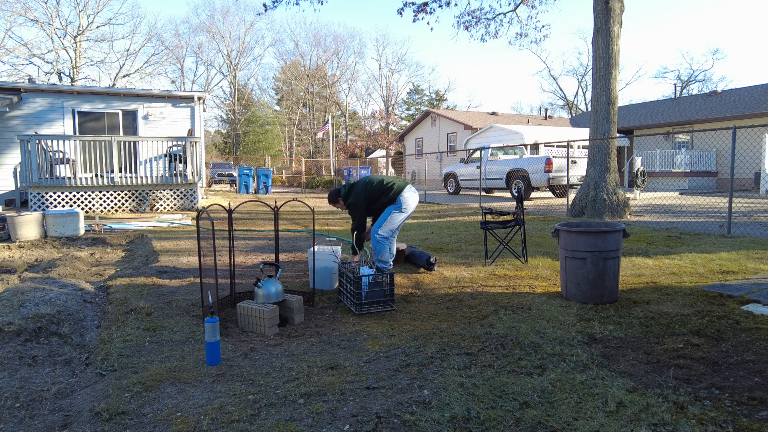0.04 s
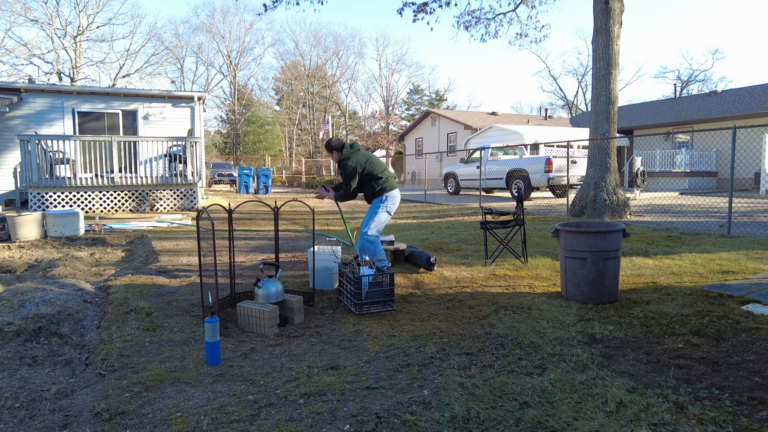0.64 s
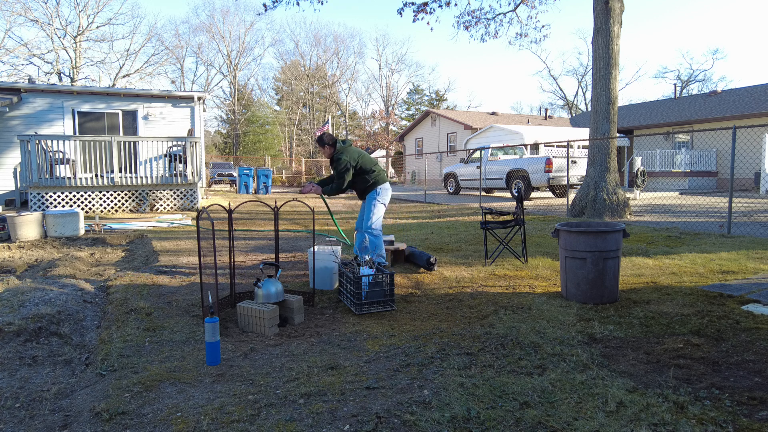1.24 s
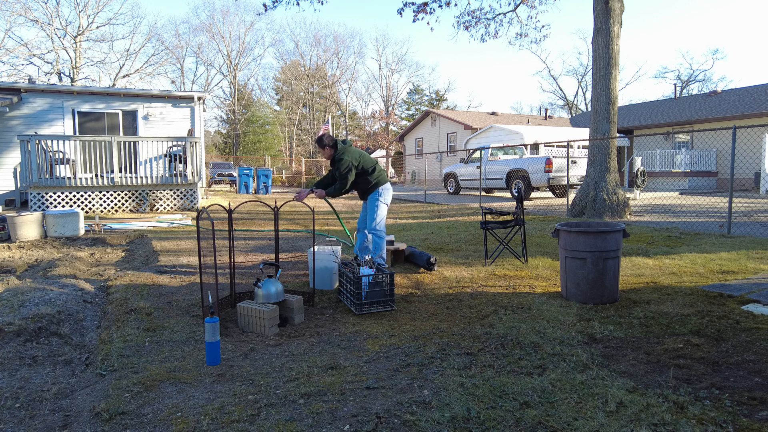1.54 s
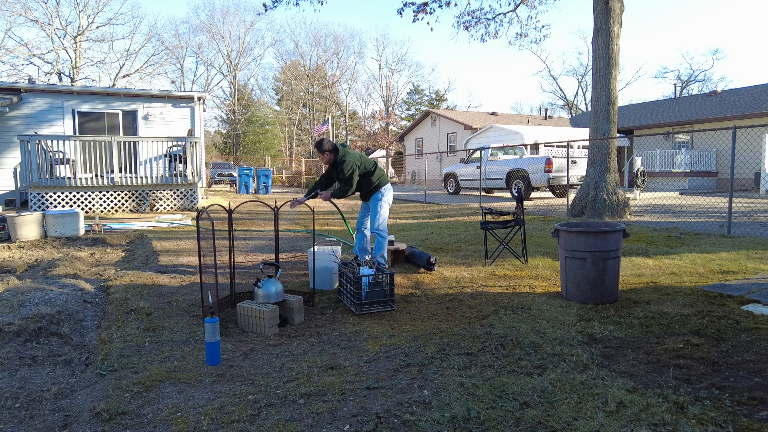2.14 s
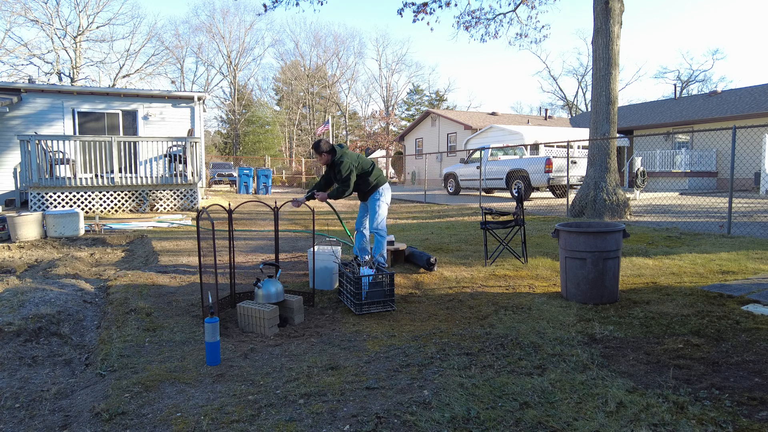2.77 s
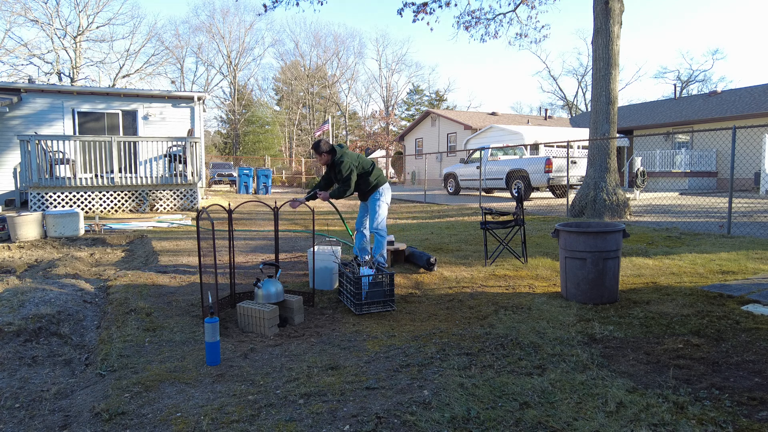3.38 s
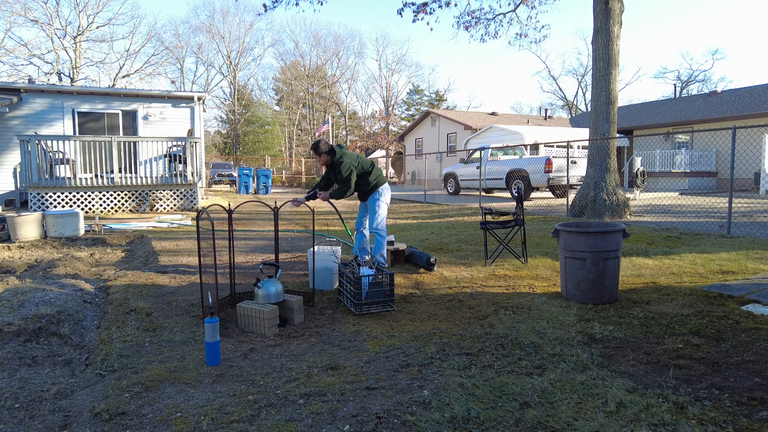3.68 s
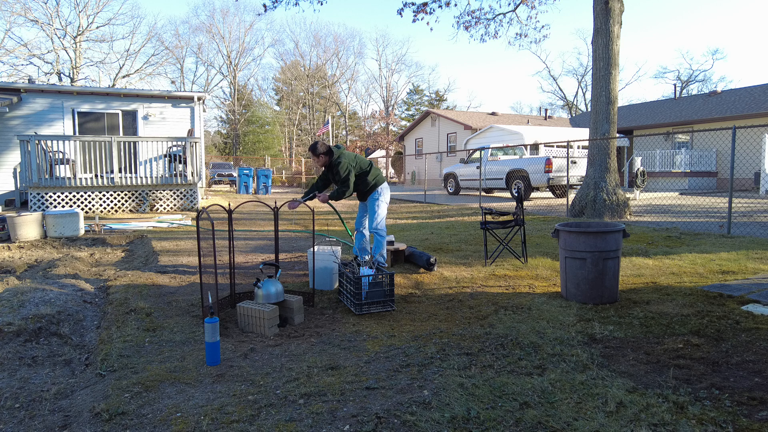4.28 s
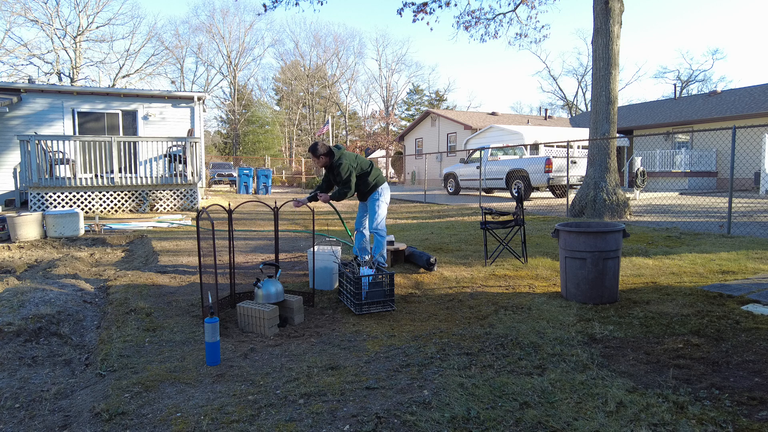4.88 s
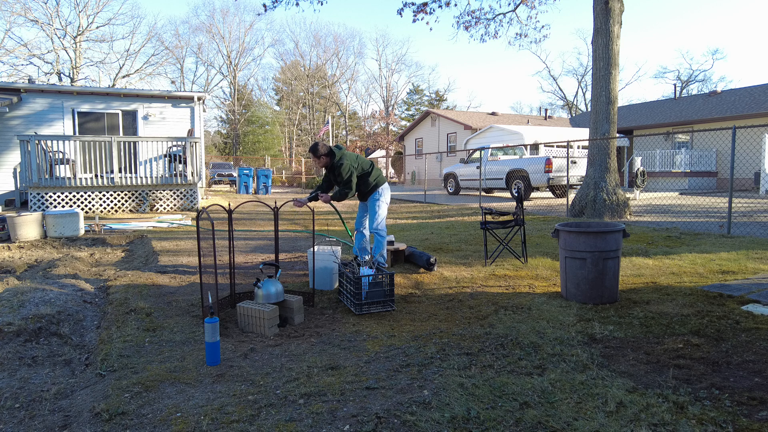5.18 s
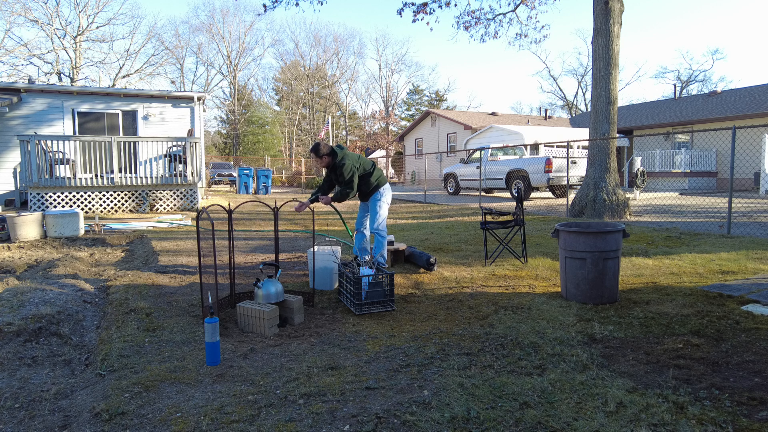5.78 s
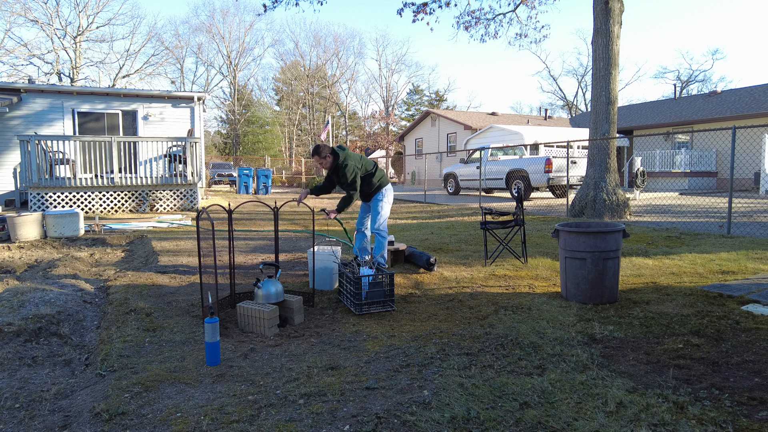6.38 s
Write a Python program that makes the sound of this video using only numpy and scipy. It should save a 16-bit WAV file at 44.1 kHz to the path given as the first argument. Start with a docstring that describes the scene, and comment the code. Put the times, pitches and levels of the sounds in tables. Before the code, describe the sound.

The scene is a quiet open yard. Throughout, two distant motors blend into a low hum that throbs five or six times a second, over a faint thin whine and a soft neighbourhood rumble. At about 1.5 seconds a garden hose opens into a bucket a few metres away, with a bright hiss and splatter. Air in the hose makes the jet sputter, briefly stalling and surging, while the water gurgles in short, hollow gulps. Big drops and the nozzle add sharp little ticks, and the handled hose knocks lightly near 1.8, 5 and 6.1 seconds. The flow weakens from around 4.7 seconds and dies away by 5.5 seconds. One last short spurt comes just before 6 seconds, followed by a few faint ticks. The hum and rumble continue until the end, at about 6.6 seconds.

```python
"""In an open yard two far motors, almost in step, beat in a throbbing hum over a thin whine and the
rumble of the neighbourhood. At 1.5 s a garden hose opens into a bucket a few metres away: drop impacts
hiss and splatter, air in the hose makes the jet sputter, and an air pocket dug by the jet gurgles.
Big drops and the nozzle tick, and the handled hose knocks. The flow dies away by 5.5 s and gives one
last spurt just before 6 s, while the hum goes on."""
import sys
import numpy as np
from scipy import signal
from scipy.fft import rfft, irfft
from scipy.io import wavfile
from scipy.ndimage import uniform_filter1d

SR = 44100
rng = np.random.default_rng(int(sys.argv[2]) if len(sys.argv) > 2 else 0)


def generate_wav(sig):
    """Save sig (samples, or channels by samples) to the path in sys.argv[1] as 16-bit PCM at SR."""
    pcm = np.round(np.clip(np.atleast_2d(sig).T, -1, 1) * 32767).astype(np.int16)
    wavfile.write(sys.argv[1], SR, pcm)


N = 291942
T, HZ = np.arange(N) / SR, np.fft.rfftfreq(N, 1 / SR)

# Spectra of the water sounds. Each row: frequency in Hz, relative spectral density in dB.
SPRAY_SPECTRUM = [(2500, -39), (4500, -21.5), (6500, -10), (8000, 0), (11500, -0.5), (13000, 1),
                  (15800, 3.5)]
SPLATTER_SPECTRUM = [(600, -10), (1200, -7), (2500, -9.5), (3700, -3.5), (5000, 1), (6300, 2.5), (8500, -5),
                     (12000, -23), (16000, -26)]
GURGLE_SPECTRUM = [(400, -18), (900, -5.5), (1400, -4), (1780, 0.5), (2200, 2), (3200, 0), (4200, 1),
                   (6500, -32), (12000, -49)]
# Resonances of the bucket. Each row: centre in Hz, width in Hz, lift in dB.
BUCKET_MODES = [(1963, 91, 4), (2580, 80, 1.5), (3306, 300, 5.5), (4580, 480, 4), (6140, 910, 2.1),
                (7390, 290, 4), (9420, 420, 5.5), (12600, 630, 5)]
# The nozzle opens, runs, shuts and spurts once more. Each row: time in seconds, level in dB.
FLOW_LEVEL = [(1.5, -96), (1.59, -57.5), (2.7, -58.5), (3.0, -57.5), (3.9, -55.5), (4.66, -58.5),
              (4.95, -62), (5.34, -63.5), (5.41, -71), (5.49, -102), (5.63, -95), (5.73, -72.5),
              (5.82, -73.5), (5.9, -61.5), (6.0, -62), (6.05, -76), (6.15, -86)]
# Air in the hose breaks the stream. Each row: start in seconds, length in seconds, gain in dB.
STALLS = [(1.78, 0.12, -3.5), (1.917, 0.084, -14), (2.507, 0.072, -8), (2.789, 0.095, -11.5),
          (3.215, .09, -3), (3.48, .12, -3), (3.755, 0.076, -7.5), (3.95, 0.073, -7), (5.01, 0.052, -10)]
# Surges slap the water. Each row: start and length in seconds, splatter and spray levels in dB.
SURGES = [(1.723, 0.13, -65.5, -70), (1.839, 0.086, -60, -59), (2.047, 0.075, -65, -60),
          (2.325, 0.19, -69.5, -61), (2.587, .11, -68.5, -56), (2.753, 0.065, -60.5, -77),
          (3.1, 0.13, -63.5, -57.5), (3.306, 0.17, -57, -57), (3.586, 0.17, -61.5, -63),
          (3.808, 0.11, -62.5, -54.5), (4.039, 0.12, -62, -70), (4.183, 0.16, -67.5, -54),
          (4.39, 0.091, -65, -65), (4.501, 0.21, -62.5, -59.5), (4.729, 0.14, -64, -60.5),
          (5.06, 0.045, -66, -60), (5.102, 0.064, -62.5, -53.5)]
# The air pocket gulps. Each row: start and length in seconds, level in dB, mid-gulp note in Hz.
GULPS = [(1.73, 0.065, -66, 3160), (1.82, 0.048, -61, 2900), (1.853, 0.068, -60.5, 2200),
         (2.76, .045, -66, 3000), (2.878, 0.17, -67.5, 2060), (3.054, 0.067, -64, 2320),
         (3.152, 0.12, -69.5, 2150), (3.308, 0.076, -58.5, 2400), (3.37, .1, -70, 2900),
         (3.528, 0.12, -66, 2120), (3.628, 0.096, -66.5, 3130), (3.821, 0.088, -62.5, 2000),
         (3.952, 0.064, -69, 2000), (4.07, .09, -75, 2400), (4.388, 0.16, -66.5, 1990),
         (4.713, 0.12, -62.5, 2800), (4.85, 0.088, -64.5, 2700), (5.131, 0.047, -63.5, 2040),
         (5.727, 0.046, -72, 3020), (5.866, 0.047, -67.5, 2450), (6.108, 0.038, -72, 2700)]
# Ticks of big drops and the nozzle. Each row: start in seconds, peak before echoes in dB, pitch in Hz.
TICKS = [(0.5584, -49, 9700), (1.5245, -51.5, 5430), (1.564, -47, 10800), (1.617, -50, 10700),
         (1.741, -40.5, 9300), (1.87, -38.5, 5570), (2.1796, -36.5, 9000), (2.788, -43, 6130),
         (3.727, -43, 13000), (4.29, -38, 9350), (4.408, -39, 9200), (4.7952, -39.5, 9000),
         (5.0497, -40, 9600), (5.0652, -39, 6000), (5.583, -56.5, 6800), (5.7436, -52, 4340),
         (5.9403, -46, 9300), (6.043, -46, 9400), (6.113, -56.5, 5000), (6.1813, -58.5, 10000),
         (6.2169, -63, 10000)]
# Knocks of the hose. Each row: start in seconds, level in dB, frequency in Hz, 60 dB decay in seconds.
KNOCKS = [(1.792, -42.5, 810, 0.0094), (1.805, -53, 700, 0.0072), (1.857, -51, 1140, .014),
          (5.065, -52.5, 1090, 0.014), (5.152, -56, 1980, 0.016), (6.1107, -54.5, 2550, 0.018),
          (6.1103, -58, 3200, 0.02), (6.1106, -58, 1220, 0.01)]
# Motor speeds. Each row: time in seconds, slow motor's rate in Hz, fast motor's lead in Hz.
MOTOR_SPEEDS = [(0, 81, 5.3), (1.4, 80.8, 5.2), (2.1, 81, 4.7), (2.8, 80.7, 5.3), (3.5, 80.7, 6.0),
                (4.4, 80.45, 6.25), (5.4, 80.35, 5.65), (6.62, 80.3, 6.0)]
# Motor tones. Each row: time in seconds, then relative levels in dB of the slow fundamental,
# the fast fundamental and the slow motor's second harmonic.
MOTOR_LEVELS = [(0.0, -51, -65, -73.5), (0.5, -51.5, -57.5, -65.5), (0.9, -54, -68, -66.5),
                (1.22, -46.5, -57, -67.5), (1.55, -64.5, -56, -71), (2.0, -68, -58, -67),
                (2.4, -52.5, -94, -65), (2.75, -63, -62, -69), (3.1, -57, -55.5, -83), (3.5, -57, -49, -70),
                (3.9, -52, -48, -66.5), (4.4, -54.5, -49, -71), (4.9, -55, -51, -80),
                (5.6, -54, -52, -69.5), (6.1, -54, -56.5, -77), (6.6, -53.5, -54, -80)]
# Third harmonics. Each row: time in seconds, relative levels in dB of the slow and the fast motor.
THIRD_HARMONICS = [(0, -84, -85), (.6, -86, -74.5), (1.2, -71, -69.5), (1.6, -90, -92), (2.4, -79, -77),
                   (3.1, -91, -75.5), (3.5, -75, -78), (3.9, -68.5, -73), (4.4, -72.5, -70),
                   (4.9, -78, -70.5), (5.6, -72, -83.5), (6.6, -93, -90)]
# The far whine and the hiss of the trees. Each row: time in seconds, relative level in dB.
WHINE_LEVEL = [(0, -79), (1.0, -76.5), (1.3, -69), (2.1, -81), (2.4, -74), (2.86, -73), (3.2, -80),
               (3.47, -73), (4.0, -88), (4.42, -66), (4.75, -84), (5.08, -66.5), (5.6, -71), (5.95, -64),
               (6.3, -68), (6.62, -72)]
LEAVES_LEVEL = [(0, -76.5), (.6, -77), (1.4, -78.5), (5.5, -81), (6.62, -85)]
# Soft low rushes. Each row: time of the crest in seconds, half width in seconds, level in dB.
RUSHES = [(.5, 0.22, -72.5), (1.21, .11, -64.5), (4.9, 1.24, -72.5), (5.83, 0.17, -68)]
# Spectra of the background noises. Each row: frequency in Hz, relative spectral density in dB.
RUMBLE_SPECTRUM = [(10, -23.5), (26, 1.5), (35, -7.5), (58, -6.5), (100, -13.5), (140, -20.5), (200, -26),
                   (400, -31.5), (750, -31.5), (1100, -37), (1550, -38), (2150, -47), (5000, -52),
                   (16000, -63)]
RUSH_SPECTRUM = [(60, -29), (150, 7.5), (280, -2), (450, 0), (700, -13), (1500, -30), (5000, -44)]
LEAVES_SPECTRUM = [(300, -15), (2000, -5), (3000, 2), (6000, -2), (10000, -7.5), (16000, -4.5)]
# Likeness of left and right. Each row: frequency in Hz, coherence from 0 to 1.
WATER_COHERENCE = [(700, 0.14), (1700, 0.98), (2800, 0.68), (3800, 0.33), (6000, 0.37), (9500, 0.39),
                   (11000, 0.48), (13000, 0.34), (16000, 0.19)]
AIR_COHERENCE = [(30, 0.98), (90, 0.99), (180, 0.78), (350, 0.57), (700, 0), (1500, 0.19), (5000, 0),
                 (16000, 0.05)]
# Resonances of the microphone's housing. Each row: centre in Hz, width in Hz, lift in dB.
HOUSING_MODES = [(1335, 99, 2.5), (2880, 410, 2), (4300, 540, 1.5), (5740, 770, 1.5), (7870, 880, 2.5),
                 (10670, 300, 2.5), (12600, 700, 0)]

SPRAY_DB, SPLATTER_DB, GURGLE_DB = -0.73, -11.5, -18.5  # relative to the flow, at full flow
FULL_FLOW_DB, COARSE_DB_PER_DB = -56, 0.61  # coarse sounds fall less as the flow weakens
ATTACK_S, RELEASE_S, SAG_DB = 0.019, 0.027, -2.5
NOTE_RISE_HZ_PER_S, POCKET_WIDTH_HZ = 3000, 540
MOTORS_OPPOSED_S, WHINE_HZ = 4.12, 629.3
RIGHT_LAG_S, BAND_LIMIT_HZ = 1.7e-5, 15830


def hose():
    """Amplitude modulation: spray, splatter and gurgle flutter together with the water pressure."""
    spray = water(SPRAY_SPECTRUM, (8000, 15800), per_s=3600, spread_db=3.5, mist=0.58, patch=(2.5, 8))
    splatter = water(SPLATTER_SPECTRUM, (3800, 7000), per_s=1600, spread_db=2, mist=0.47, patch=(2, 6))
    gurgle = water(GURGLE_SPECTRUM, (1500, 3500), per_s=980, spread_db=3, mist=0.99, patch=(2, 3))
    gurgle = 0.59 * gurgle + 0.87 * air_pocket(gurgle)
    spray_gain, splatter_gain, gurgle_gain = stream_gains()
    jet = spray * spray_gain + splatter * splatter_gain + gurgle * gurgle_gain
    flutter = gain_of(0.15 * drift(hz=89) + 0.37 * drift(hz=12))
    return jet * flutter * gain_of([[.4], [-.4]])


def water(spectrum, band_hz, per_s, spread_db, mist, patch):
    """Shot noise: drops over a mist of tiny ones, filtered by the bucket; unit mono RMS in band_hz."""
    def impacts():
        sizes = gain_of(spread_db * np.minimum(rng.exponential(1, N), 5))
        drops = evened(sizes * rng.choice([-1, 1], N) * (rng.random(N) < per_s / SR))
        patter = drops + 0.45 * reflections(drops, t60=0.04) + mist * rng.standard_normal(N)
        return rfft(wobble(patter, *patch))
    spectra = stereo_pair(impacts(), impacts(), WATER_COHERENCE)
    spectra *= gain_of(over_frequency(spectrum) + resonance_db(BUCKET_MODES))
    spectra[1] *= np.exp(-2j * np.pi * HZ * RIGHT_LAG_S)
    in_band = irfft(spectra.mean(0) * (HZ > band_hz[0]) * (HZ < band_hz[1]), N)
    return irfft(spectra, N) / in_band.std()


def wobble(x, depth_db, bins):
    """Spectral modulation: as the stream wobbles, patches of its spectrum swell and fade."""
    frames = signal.stft(x, nperseg=256)[2]
    field = rng.standard_normal(frames.shape)
    for _ in range(2):
        field = uniform_filter1d(uniform_filter1d(field, size=bins, axis=0), size=7, axis=1)
    return signal.istft(frames * gain_of(depth_db * evened(field)), nperseg=256)[1][:N]


def stream_gains():
    """Incoherent sounds add in power: surges and gulps ride on a flow broken by stalls."""
    flow = level(FLOW_LEVEL) * gain_of(sum(db * disturbance(s, length) for s, length, db in STALLS))
    coarse = gain_of(FULL_FLOW_DB) * (flow / gain_of(FULL_FLOW_DB)) ** COARSE_DB_PER_DB
    slaps, sprays = sum(gain_of([[slap_db], [spray_db]]) * disturbance(s, length)
                        for s, length, slap_db, spray_db in SURGES)
    gulps = sum(gain_of(db) * disturbance(s, length) for s, length, db, _ in GULPS)
    return (np.hypot(gain_of(SPRAY_DB) * flow, sprays),
            np.hypot(gain_of(SPLATTER_DB) * coarse, slaps),
            np.hypot(gain_of(GURGLE_DB) * coarse, gulps))


def disturbance(start, length):
    """The envelope of a stall, surge or gulp: linear attack, sagging hold, linear release."""
    age = np.clip(T - start, 0, length)
    attack, release = np.minimum(age / ATTACK_S, 1), np.minimum((length - age) / RELEASE_S, 1)
    return attack * release * gain_of(SAG_DB * age / length)


def air_pocket(x):
    """Cavity resonance: within each gulp the pocket closes, so its hollow note climbs."""
    start, length, _, mid_hz = np.transpose(GULPS)
    gulp = np.maximum(np.searchsorted(start, T) - 1, 0)
    age = np.clip(T - start[gulp], 0, length[gulp])
    note_hz = mid_hz[gulp] + NOTE_RISE_HZ_PER_S * (age - length[gulp] / 2)
    carrier = np.exp(2j * np.pi * np.cumsum(note_hz) / SR)
    pole = np.exp(-np.pi * POCKET_WIDTH_HZ / SR)
    # shift the note down to 0 Hz, smooth, and shift back
    return 2 * (carrier * signal.lfilter([1 - pole], [1, -pole], x / carrier)).real


def ticks_and_knocks():
    """Impulsive excitation: a tick is a brief snap with a quick echo, a knock is one damped mode."""
    direct, t = np.zeros(N), T[:2048]
    for start, db, hz in TICKS:
        burst = rng.standard_normal(len(t)) * np.exp(-t / .0005)
        band_hz = [hz * 0.56, min(hz * 1.41, BAND_LIMIT_HZ)]
        snap = signal.sosfilt(signal.butter(2, band_hz, "band", fs=SR, output="sos"), burst)
        snap *= gain_of(db) / abs(snap).max()
        add(direct, start, snap)
        add(direct, start + 0.001104, 0.23 * snap)
    for start, db, hz, t60 in KNOCKS:
        add(direct, start, gain_of(db - 60 * t / t60) * np.sin(2 * np.pi * hz * t))
    return direct + gain_of(-0.5) * np.array([reflections(direct, t60) for t60 in (0.16, 0.071)])


def reflections(x, t60):
    """Reverberation: dense echoes off the bucket wall and the ground decay exponentially."""
    t = T[:4096]
    response = evened(rng.standard_normal(len(t)) * gain_of(-60 * t / t60))
    return signal.oaconvolve(x, response)[:N] / np.sqrt(len(t))


def motors():
    """Beating: the fundamentals of two motors interfere five or six times a second."""
    slow_hz, lead_hz = over_time(MOTOR_SPEEDS)
    slow = 2 * np.pi * (np.cumsum(slow_hz) / SR + rng.random())
    lead = 2 * np.pi * np.cumsum(lead_hz) / SR
    fast = slow + lead - np.interp(MOTORS_OPPOSED_S, T, lead) + np.pi
    slow_gain, fast_gain, second = gain_of(over_time(MOTOR_LEVELS))
    slow_third, fast_third = gain_of(over_time(THIRD_HARMONICS))
    side = np.array([[-.077], [.077]])  # radians: the hum arrives first on the right
    fundamentals = slow_gain * np.sin(slow + side) + fast_gain * np.sin(fast + side)
    harmonics = second * np.sin(2 * slow + side) + slow_third * np.sin(3 * slow)
    harmonics += fast_third * np.sin(3 * fast)
    upper = sum(slow_gain * gain_of(db + 3.4 * drift(hz=2.5)) * np.sin(k * slow + 0.91 * drift(hz=8.1))
                for k, db in [(4, -28), (5, -31)])
    flutter = gain_of(0.83 * drift(hz=25.3))
    return np.sqrt(2) * (gain_of(1.36) * fundamentals * flutter + gain_of(1.0) * harmonics + upper)


def whine():
    """Fading in propagation: a far tone wavers on its way through the air, differently on each side."""
    phase = 2 * np.pi * WHINE_HZ * T + 0.21 * drift(hz=8.8)
    tone = np.array([np.sin(phase + offset + 0.96 * drift(hz=9.7)) * gain_of(0.78 * drift(hz=7))
                     for offset in (.8, 0)])
    return tone * level(WHINE_LEVEL) * gain_of([[2], [1]])


def neighbourhood():
    """Superposition of noises: a steady rumble, soft swelling rushes and the hiss of the trees."""
    swells = sum(gain_of(db) * np.exp(-((T - s) / width) ** 2) for s, width, db in RUSHES)
    rushes = swells * distant_noise(RUSH_SPECTRUM) * gain_of([[.5], [-.5]])
    rumble = gain_of(-53) * distant_noise(RUMBLE_SPECTRUM)
    return rumble + rushes + level(LEAVES_LEVEL) * distant_noise(LEAVES_SPECTRUM)


def distant_noise(spectrum):
    """A diffuse field of unit RMS: left and right are alike only at long wavelengths."""
    a, b = rfft(rng.standard_normal((2, N)))
    return evened(irfft(stereo_pair(a, b, AIR_COHERENCE) * gain_of(over_frequency(spectrum)), N))


def stereo_pair(a, b, coherence):
    """Partial coherence: the weighted sum and difference of two independent spectra."""
    likeness = np.clip(over_frequency(coherence), -1, 1)
    mid, side = a * np.sqrt((1 + likeness) / 2), b * np.sqrt((1 - likeness) / 2)
    return np.array([mid + side, mid - side])


def resonance_db(modes):
    """Resonance: each mode lifts the spectrum in a bell around its centre."""
    return sum(db / (1 + (2 * (HZ - hz) / width) ** 2) for hz, width, db in modes)


def drift(hz):
    """Random modulation: low-passed noise of unit RMS."""
    return evened(irfft(rfft(rng.standard_normal(N)) / (1 + (HZ / hz) ** 4), N))


def gain_of(db):
    """Decibels as an amplitude ratio."""
    return 10 ** (np.asarray(db) / 20)


def evened(x):
    """Normalisation to unit RMS."""
    return x / np.sqrt(np.mean(x ** 2) + 1e-20)


def over_frequency(rows):
    """Interpolation on a logarithmic frequency axis."""
    hz, value = np.transpose(rows)
    return np.interp(np.log(HZ + 1), np.log(hz + 1), value)


def over_time(rows):
    """Linear interpolation of each column in time."""
    s, *columns = np.transpose(rows)
    return [np.interp(T, s, column) for column in columns]


def level(rows):
    """Gain along a decibel curve, silent outside it."""
    s, db = np.transpose(rows)
    return gain_of(np.interp(T, s, db, left=-120, right=-120))


def add(mix, start, sound):
    """Superposition of a sound from its start in seconds."""
    part = mix[round(start * SR):][:len(sound)]
    part += sound[:len(part)]


def scene():
    """Superposition: the pressures of all sources add."""
    return hose() + ticks_and_knocks() + motors() + whine() + neighbourhood()


def record(dry):
    """Linear filtering: the housing's resonances colour the sound, and a low-pass limits its band."""
    coloured = irfft(rfft(dry) * gain_of(resonance_db(HOUSING_MODES)), N)
    low_pass = signal.firwin(511, BAND_LIMIT_HZ, window=("kaiser", 9), fs=SR)
    return signal.oaconvolve(coloured, low_pass[None], "same")


dry = scene()
out = record(dry)
generate_wav(out)
```